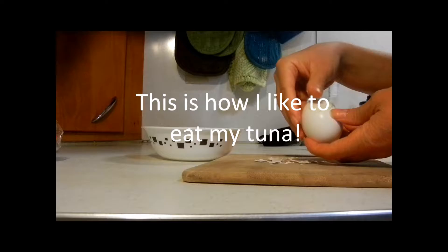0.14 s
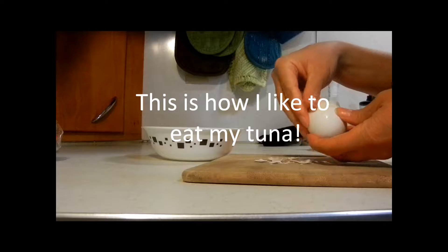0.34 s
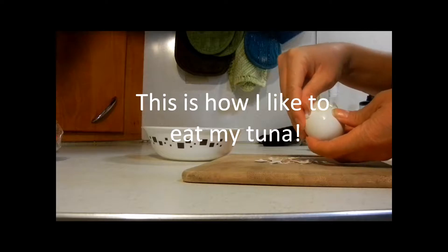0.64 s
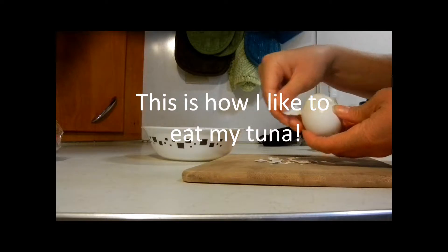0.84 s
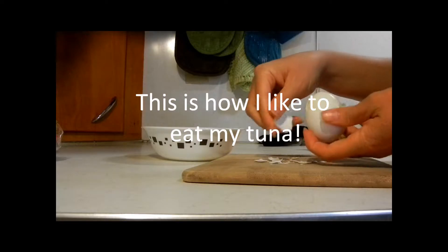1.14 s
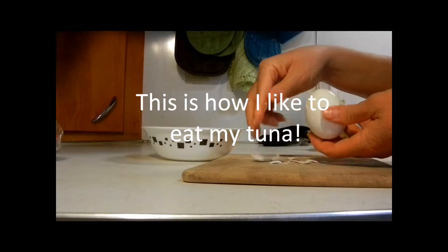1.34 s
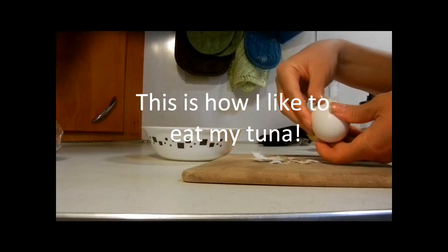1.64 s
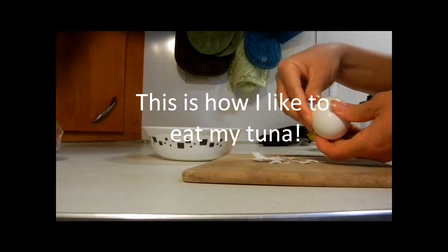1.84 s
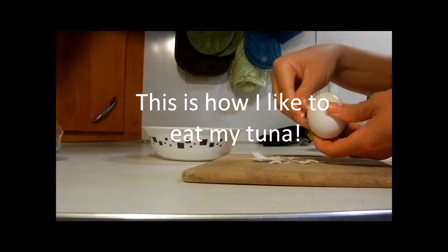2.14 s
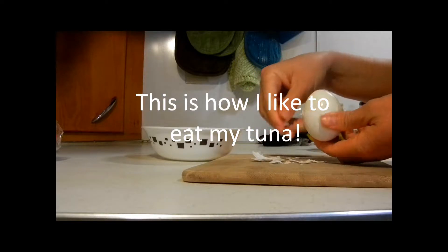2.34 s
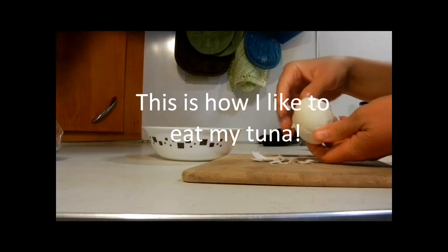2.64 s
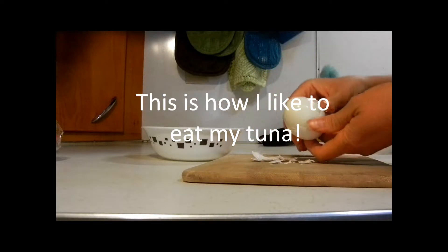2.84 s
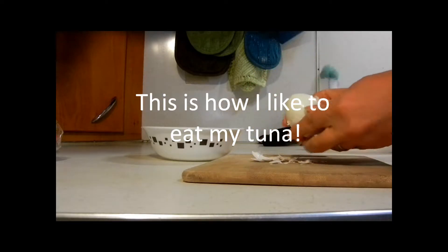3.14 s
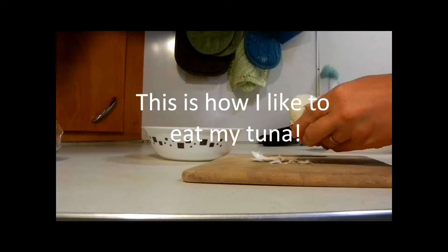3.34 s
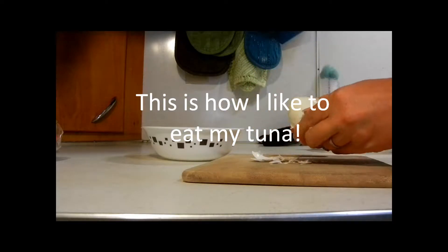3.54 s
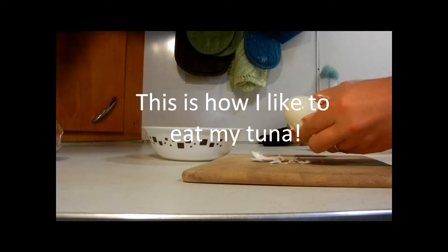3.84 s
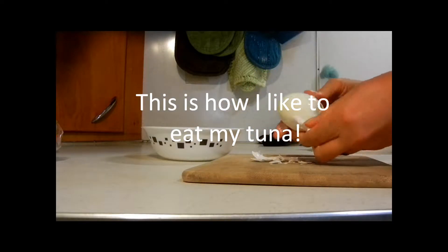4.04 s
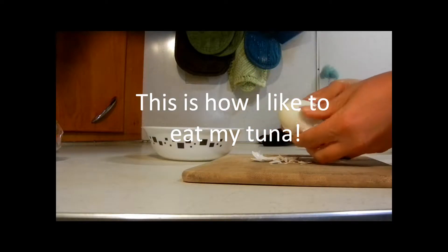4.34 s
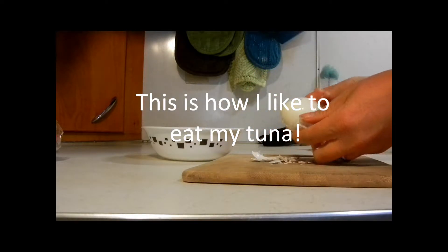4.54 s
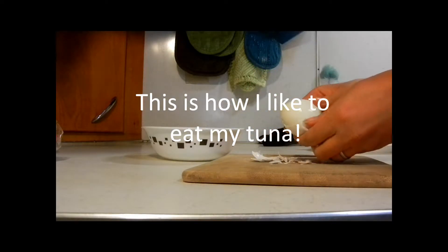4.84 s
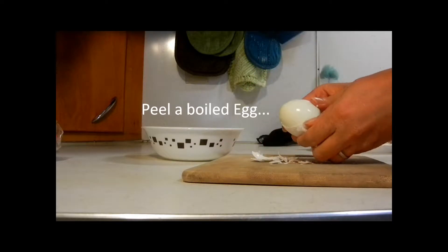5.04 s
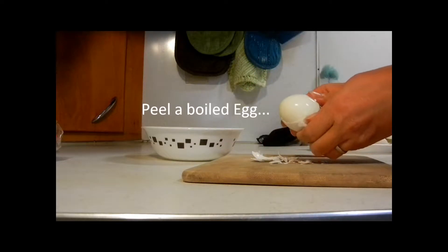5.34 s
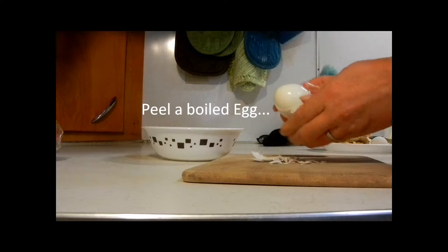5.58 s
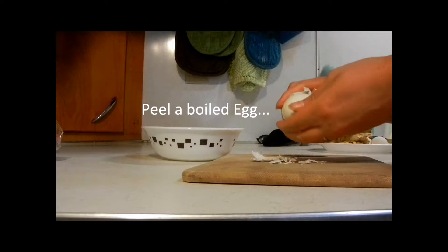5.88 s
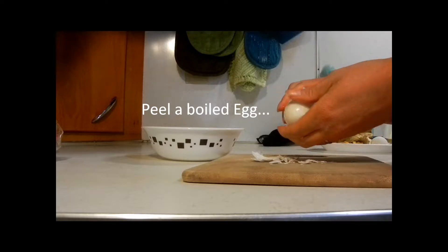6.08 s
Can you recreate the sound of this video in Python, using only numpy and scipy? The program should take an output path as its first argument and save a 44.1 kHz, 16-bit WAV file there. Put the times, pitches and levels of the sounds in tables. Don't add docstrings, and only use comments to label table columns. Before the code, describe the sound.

Close stereo sound of fingers peeling a boiled egg in a small kitchen. A sharp crack and a flake tapping a wooden board come first, then scattered snaps and fine crackling. Just before four seconds a big piece of shell breaks away with a loud crunch. Sparser ticks follow over constant fridge hum, fan drone and light hiss.

```python
import sys
import numpy as np
from scipy import signal
from scipy.fft import rfft, irfft
from scipy.io import wavfile

SR = 44100
rng = np.random.default_rng(int(sys.argv[2]) if len(sys.argv) > 2 else 0)


def voltage_ratio(level):
    return 10 ** (np.asarray(level, float) / 20)


def transcribe(signal):
    frames = np.atleast_2d(signal).T
    limited = np.clip(frames, -1, 1)
    pcm = np.round(limited * 32767).astype(np.int16)
    wavfile.write(sys.argv[1], SR, pcm)


N = 273861
TIME = np.arange(N) / SR
OPPOSITE = np.array([[1], [-1]])


def band(x, lo_hz, hi_hz):
    return signal.sosfilt(signal.butter(2, [lo_hz, min(hi_hz, .47 * SR)], "band", fs=SR, output="sos"), x)


def coloured(shape, db, channels):
    hz, gain_db = np.transpose(shape)
    bin_hz = np.arange(N // 2 + 1) * SR / N
    tint = voltage_ratio(np.interp(np.log(bin_hz + 1), np.log(hz), gain_db))
    noise = irfft(rfft(rng.standard_normal((channels, N))) * tint, N)
    return noise * voltage_ratio(db) / noise.std()


def fade(t60_ms, size):
    return np.exp(-np.log(1000) * np.arange(size) / (t60_ms * SR / 1000))


def add(out, s, sound):
    i = int(s * SR)
    out[i:i + len(sound)] += sound[:len(out) - i]


# (frequency [Hz], rms level [dB])
HUM_LINES = [(58.46, -80), (116.56, -77.5), (120.01, -65.5), (175.42, -108), (191.65, -54), (233.12, -58),
             (240.02, -66), (263.49, -63), (292.32, -63.5), (350.8, -64), (409.28, -62.5), (467.74, -67.5),
             (526.22, -55), (584.68, -60), (643.14, -56), (701.62, -61), (760.08, -63), (818.54, -62),
             (877.02, -68), (1227.83, -75.5), (1403.23, -70.5), (1812.49, -73)]


def hum():
    total = np.zeros((2, N))
    for (hz, db), (start, lag) in zip(HUM_LINES, rng.random((len(HUM_LINES), 2))):
        cycles = hz * TIME + start + .03 * (2 * lag - 1) * OPPOSITE
        total += voltage_ratio(db + 2.5) * np.sin(2 * np.pi * cycles)
    return total


# (frequency [Hz], density [dB per Hz])
AIR_SPECTRUM = [(15, -52), (25, -29), (43, -16), (133, -11.5), (197, 1), (470, -8), (524, -4.5), (584, -6),
                (637, -8.5), (863, -8.5), (1030, -17.5), (1360, -13), (1620, -16.5), (2560, -19),
                (4500, -36.5), (5850, -79), (9900, -120)]
# (frequency [Hz], density [dB per Hz])
HISS_SPECTRUM = [(20, -25), (60, -3.5), (200, -10.5), (1000, -12), (2500, -13), (5000, -22.5),
                 (10000, -25.5), (17000, -25)]


def air():
    mid, side = coloured(AIR_SPECTRUM, -49, channels=2)
    return mid + voltage_ratio(-18) * side * OPPOSITE + coloured(HISS_SPECTRUM, -54.5, channels=2)


def voice(ring, snap, fizz, knock):
    cup = band(ring, 2150, 3050)
    flake = band(snap, 2250, 7350)
    edge = band(band(fizz, 9000, 17500), 8100, 22300)
    finger = band(knock, 1120, 2500)
    return cup + flake + edge + finger


# (time [s], ring frequency [Hz], ring level [dB],
# edge level [dB])
SHELL_CRACKS = [(0.1013, 2900, -18, -31), (0.1053, 2800, -35, -31), (.704, 2980, -36, -40),
                (0.7532, 2680, -25, -36), (.78, 2700, -29, -39), (0.808, 2280, -28, -26),
                (.8455, 2650, -36, -36), (1.3939, 2740, -35, -32.5), (1.4058, 1460, -36, -55),
                (1.4377, 2500, -34, -46), (2.0934, 2100, -25, -28), (2.1217, 2490, -35, -30),
                (2.1325, 2490, -27, -33), (2.1752, 2450, -31, -32), (2.1925, 3020, -33, -23),
                (2.243, 2640, -31, -33), (2.2597, 2190, -26, -39), (2.271, 2280, -29, -33),
                (2.5712, 2790, -21.5, -50), (2.6984, 2700, -38.5, -45), (3.4878, 2900, -31.5, -41),
                (3.557, 2850, -35.5, -37), (3.6187, 2970, -37, -41), (4.528, 2720, -33, -42),
                (4.6285, 2780, -40, -37), (4.7939, 2610, -24, -34), (5.3395, 2540, -24.5, -48),
                (5.3447, 2350, -25, -41), (5.444, 3540, -30.5, -35), (6.1798, 2670, -31.5, -37),
                (3.797, 2460, -39, -48), (3.8104, 2710, -40, -41), (3.86, 2480, -23, -33.5),
              (3.874, 2800, -31, -28), (3.8828, 2530, -31, -35), (3.886, 2490, -26, -34),
              (3.8893, 2610, -12, -28), (3.893, 2720, -6, -34), (3.8958, 2770, -17, -18),
              (3.8991, 2330, -11, -37), (3.9107, 2200, -4.5, -24), (3.9137, 2340, -24, -32),
              (3.921, 2250, -28, -38), (3.9242, 2270, -24, -41), (3.933, 2540, -32, -31),
              (3.97, 2530, -17, -32), (3.9732, 2500, -16, -26), (4.017, 2630, -38, -53),
              (4.0276, 2530, -42, -44), (4.0618, 2700, -31, -44), (4.065, 2610, -29, -42),
              (4.0986, 2630, -36, -36), (4.1171, 2570, -31, -38), (4.18, 2900, -32, -41),
              (4.2427, 2700, -35, -52), (4.926, 2650, -35.5, -53), (5.632, 2500, -37, -60),
              (5.9234, 2550, -43, -42), (5.9763, 2720, -20.5, -36), (5.9877, 2710, -36, -34)]
# (time [s], edge level [dB], brightness [dB])
SPLINTER_CRACKS = [(.8595, -35, 8), (1.0065, -37, 12), (1.4922, -37, 8), (1.9928, -39, -1),
                   (2.063, -38, -8), (2.0755, -44, 0), (2.0829, -41, 10), (2.1276, -28, -12),
                   (2.1439, -26, 16), (2.234, -33, 20), (2.247, -33, -16), (2.3128, -32.5, 4),
                   (2.4194, -37, 2), (2.6031, -44, 18), (3.461, -27, 8), (3.578, -37, 2), (3.604, -41, -2),
                   (4.102, -32, -5), (4.1553, -36, -8), (4.1624, -36, 2), (4.2157, -32.5, -17),
                   (4.6164, -38, 5), (4.8254, -45, 14), (5.3224, -51, -4), (5.929, -44, -16),
                   (6.0313, -35, 7), (.7081, -46, -14), (1.4142, -45, -16), (2.5714, -37, 25),
                   (3.902, -26, -22)]


def cracks():
    cup_hz, splinter_ring_db, crack_bright_db, bright_scatter_db = 2500, -19, -2, 6
    breaks = [(*crack, crack_bright_db) for crack in SHELL_CRACKS]
    for s, edge_db, bright_db in SPLINTER_CRACKS:
        breaks.append((s, cup_hz, edge_db + splinter_ring_db, edge_db, bright_db))
    ring, knock, snap, fizz = np.zeros((4, N))
    jolts = rng.standard_normal((len(breaks), 4, 400))
    jolts[:, :3, 0] = 9 * np.sign(jolts[:, :3, 0])
    t = np.arange(600) / SR
    ring_shape = (1 - np.exp(-t / .0004)) * fade(9.2, size=len(t))
    for (s, hz, ring_db, edge_db, bright_db), (flake, edge, finger, chance) in zip(breaks, jolts):
        tilt_db = (bright_db + bright_scatter_db * chance[0]) / 2
        add(ring, s - .0002, voltage_ratio(ring_db + 1.5) * ring_shape * np.sin(2 * np.pi * hz * t))
        add(knock, s, voltage_ratio(ring_db - 14) * finger * fade(6, size=400))
        add(snap, s, voltage_ratio(edge_db - tilt_db - 13) * flake * fade(27, size=400))
        add(fizz, s, voltage_ratio(edge_db + tilt_db - 9.5) * edge * fade(8.8, size=400))
    return ring + voice(knock, snap, fizz, 0.078 * knock)


# (time [s], peak level [dB])
FALLING_FLAKES = [
    (.1014, -17.5),
    (2.5716, -21),
]
# (frequency [Hz], width [Hz], t60 [ms], delay [ms], level [dB])
BOARD_MODES = [(1454, 294, 23, 3.5, 4), (2330, 830, 25, -1, -2), (4540, 1200, 34, 9, -27),
               (6500, 1100, 70, 1.5, -21), (1820, 1850, 200, 1.5, -19.5)]


def drops():
    out = np.zeros(N)
    rattles = rng.standard_normal((len(FALLING_FLAKES), len(BOARD_MODES), 3000))
    for (s, db), rattle in zip(FALLING_FLAKES, rattles):
        for (hz, width_hz, t60_ms, late_ms, mode_db), noise in zip(BOARD_MODES, rattle):
            tap = band(noise * fade(t60_ms, size=3000), hz - width_hz / 2, hz + width_hz / 2)
            add(out, s + late_ms / 1000, voltage_ratio(db + mode_db + 6) * tap)
    return out


# (time [s], frequency [Hz], level [dB], t60 [ms])
LOOSE_CHIPS = [(.752, 2720, -24, 150), (3.969, 5000, -23.5, 30), (.102, 4000, -25, 50),
               (.809, 1700, -22.5, 50), (0.808, 5640, -31, 40), (.809, 13600, -38, 27),
               (1.394, 10600, -36, 20), (1.405, 1390, -29, 50), (1.437, 1340, -27.5, 60),
               (1.44, 1950, -32, 50), (2.064, 1310, -33, 30), (2.128, 5200, -23, 80),
               (2.245, 4300, -36, 60), (2.259, 1490, -28, 55), (2.573, 2700, -26, 37),
               (3.464, 6800, -21, 30), (3.901, 4880, -15, 66), (3.906, 1990, -11, 90),
               (4.355, 1500, -34, 20), (5.445, 3700, -33, 29), (5.977, 2670, -24.5, 120),
               (5.978, 3800, -24.5, 120), (6.18, 3670, -32.5, 30)]


def chips():
    out = np.zeros(N)
    half_width = 0.11
    for (s, hz, db, t60_ms), noise in zip(LOOSE_CHIPS, rng.standard_normal((len(LOOSE_CHIPS), 3000))):
        rattle = noise * fade(t60_ms, size=3000)
        add(out, s, voltage_ratio(db) * band(rattle, hz * (1 - half_width), hz * (1 + half_width)))
    return out


# (start [s], length [s], cup level [dB], edge level [dB], brightness [dB])
SNAPPED_TEARS = [(0.746, 0.14, -43.5, -55, 2), (0.801, 0.13, -44, -45, -6), (1.398, .09, -48, -59, 1),
                 (1.493, 0.02, -54, -53.5, 6), (2.064, 0.059, -46, -48, -6), (2.5715, .05, -56, -54, 21),
                 (3.465, .09, -53, -42, 2.5), (3.79, 0.36, -47.5, -55.5, -6), (3.894, 0.075, -17, -34, -2),
                 (3.967, 0.061, -37, -44.5, -4), (4.787, 0.13, -44.5, -53.5, -3),
                 (5.337, .06, -38.5, -48, -1.5), (5.448, 0.033, -40.5, -49.5, 0),
                 (5.974, 0.11, -41, -42.5, -7), (6.184, 0.028, -39, -50, 4)]
# (strongest time [s], length [s], cup level [dB], edge level [dB], brightness [dB])
PULLED_TEARS = [(.848, .1, -55, -55, -2), (1.012, 0.18, -68, -58.5, 2), (1.44, .05, -43, -56, -2),
                (1.851, 0.069, -54, -57.5, 2), (2.104, .06, -40, -47, 2), (2.133, 0.071, -30, -38.5, -10.5),
                (2.184, .045, -44, -47, 5), (2.261, 0.11, -50, -44.5, -2), (3.613, 0.11, -50, -51.5, -4),
                (4.068, 0.13, -43, -50, -6.5), (4.108, 0.11, -41.5, -50.5, -3), (4.162, 0.12, -47, -48, 0),
                (4.208, 0.11, -42.5, -49, -1), (4.451, 0.043, -67, -58, -4), (4.61, 0.27, -55, -61, 4),
                (4.93, 0.077, -50, -58, -1), (5.315, 0.092, -49, -57.5, -3), (5.63, 0.049, -45, -70, -6),
                (5.95, 0.19, -47, -52, -7), (6.035, .07, -50, -51, 6)]


def tearing(fibres_per_s=5000, patchy_db=4):
    snap_s, swell_share = 0.0017, 0.24
    rise_db, fall_db = 8, 23.5
    knock_db = -8
    fibres = rng.random(N) < fibres_per_s / SR
    patches = np.repeat(rng.standard_normal((4, N // 150 + 1)), 150, axis=1)[:, :N]
    layers = fibres * voltage_ratio(patchy_db * patches) * rng.standard_normal((4, N))
    strokes = [(s - snap_s, s, s + length, *mix) for s, length, *mix in SNAPPED_TEARS]
    for s, length, *mix in PULLED_TEARS:
        strokes.append((s - swell_share * length, s, s + (1 - swell_share) * length, *mix))
    effort = np.zeros((4, N))
    for start, top, end, cup_db, edge_db, bright_db in strokes:
        shape_db = np.interp(TIME, [start, top, end], [-rise_db, 0, -fall_db], left=-120, right=-120)
        dull_db = edge_db - bright_db / 2
        sharp_db = edge_db + bright_db / 2
        mix_db = [[cup_db], [dull_db], [sharp_db], [dull_db + knock_db]]
        effort = np.maximum(effort, voltage_ratio(shape_db + mix_db))
    make_up = voltage_ratio([[8], [4], [3], [9]])
    return voice(*(effort * layers * make_up / layers.std()))


# (time [s], frequency [Hz], level [dB])
PIPE_WHISTLE = [
    (5.02, 575, -76),
    (5.2, 648, -66),
    (5.3, 669, -61),
    (5.53, 670, -60),
    (5.57, 670, -80),
]


def whine():
    s, hz, db = np.transpose(PIPE_WHISTLE)
    phase = np.cumsum(np.interp(TIME, s, hz)) / SR
    return voltage_ratio(np.interp(TIME, s, db + 5, left=-120, right=-120)) * np.sin(2 * np.pi * phase)


def thud():
    out = np.zeros(N)
    bump = fade(30, size=2000) * np.sin(2 * np.pi * 230 * TIME[:2000])
    add(out, 6.112, voltage_ratio(-38) * bump)
    return out


def ports(x):
    scatter = rng.standard_normal(600) * fade(20, size=600)
    treble = band(x, 4900, 22400)
    other = signal.fftconvolve(treble, scatter / np.linalg.norm(scatter))[:N]
    return x - (.17 * treble + .58 * other) * OPPOSITE


# (frequency [Hz], t60 [s])
KITCHEN_TAIL = [(1000, 0.48), (2500, 0.36), (6000, 0.31), (14000, 0.065)]


def kitchen(x, near_db=-9, tail_db=-12):
    size = SR // 2
    sparse = (rng.random(size) < .04) * rng.standard_normal(size) * fade(50, size=size)
    sparse[:60] = 0
    noise = rng.standard_normal((3, size))
    noise = noise[0] + 0.16 * noise[1] * OPPOSITE
    tail = np.zeros((2, size))
    for hz, t60_s in KITCHEN_TAIL:
        tail += band(noise, hz * 0.56, hz * 1.69) * fade(1000 * t60_s, size=size)
    tail *= 1 - fade(47, size=size)
    near = voltage_ratio(near_db) * sparse / np.linalg.norm(sparse)
    echo = near + voltage_ratio(tail_db) * tail / np.linalg.norm(tail[0])
    return signal.fftconvolve(x, echo, axes=1)[:, :N]


def scene():
    room = hum() + air() + whine()
    shell = cracks() + drops() + tearing() + thud()
    direct = ports(shell + chips())
    return direct + kitchen(direct) + room


def band_limit(x):
    return signal.sosfilt(signal.butter(12, 16960, fs=SR, output="sos"), x)


def record(dry):
    top = signal.ellip(10, .2, 24, 15750, fs=SR, output="sos")
    mix = signal.sosfiltfilt(top, dry) + 0.00044
    return band_limit(mix)


dry = scene()
out = record(dry)
transcribe(out)
```